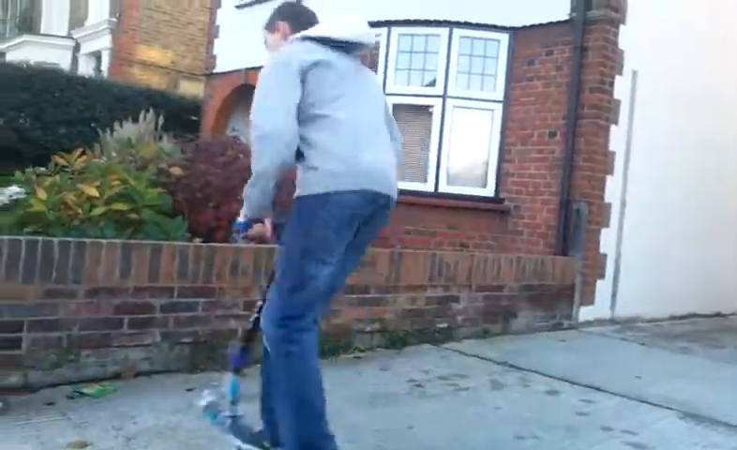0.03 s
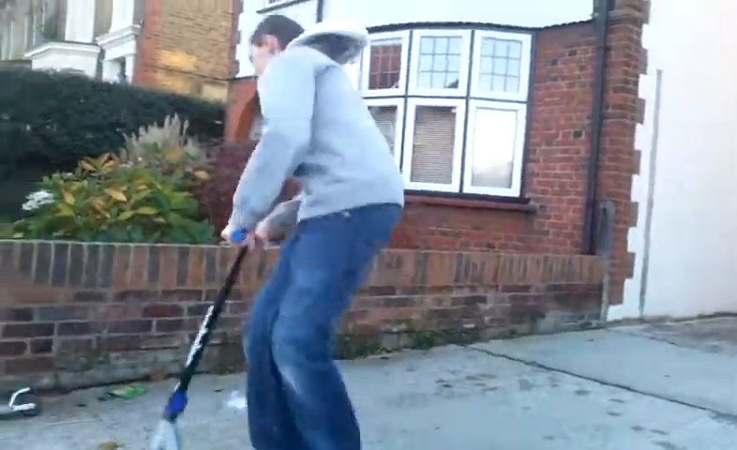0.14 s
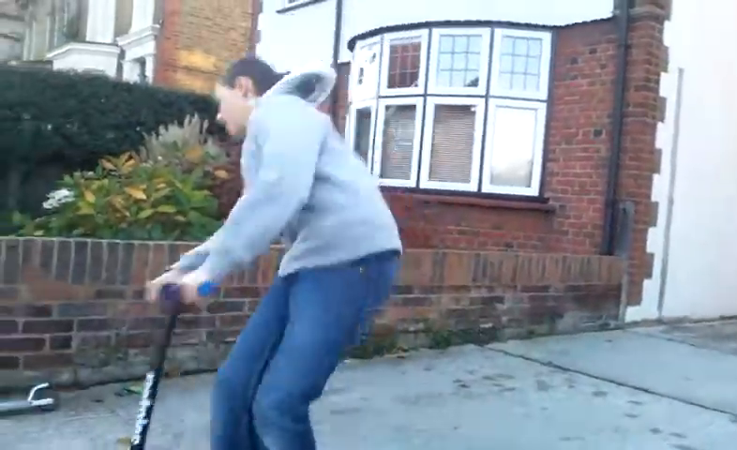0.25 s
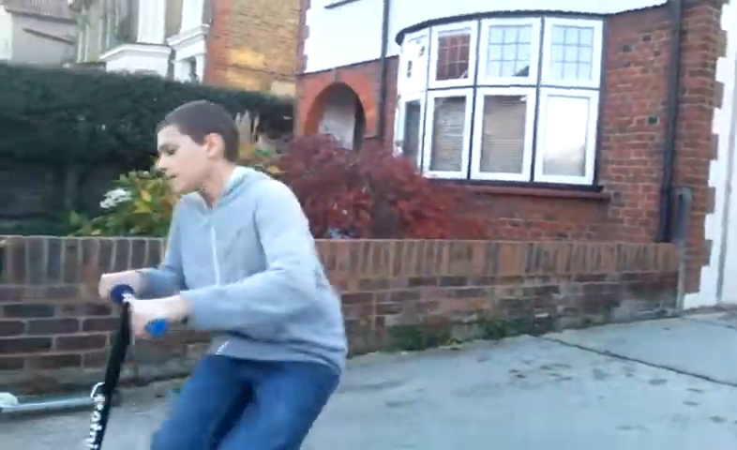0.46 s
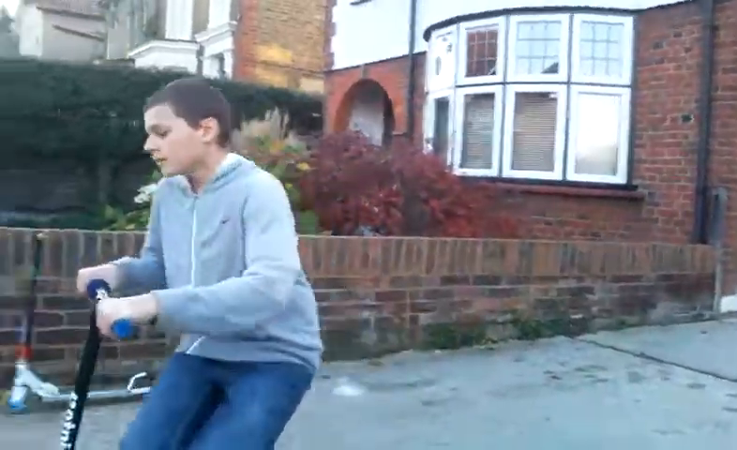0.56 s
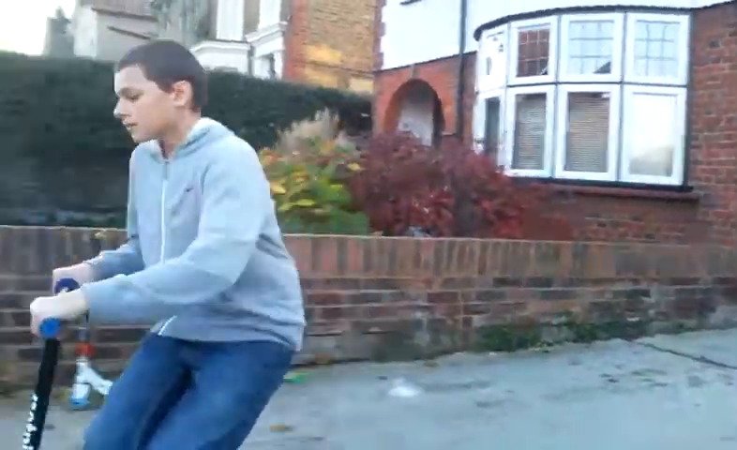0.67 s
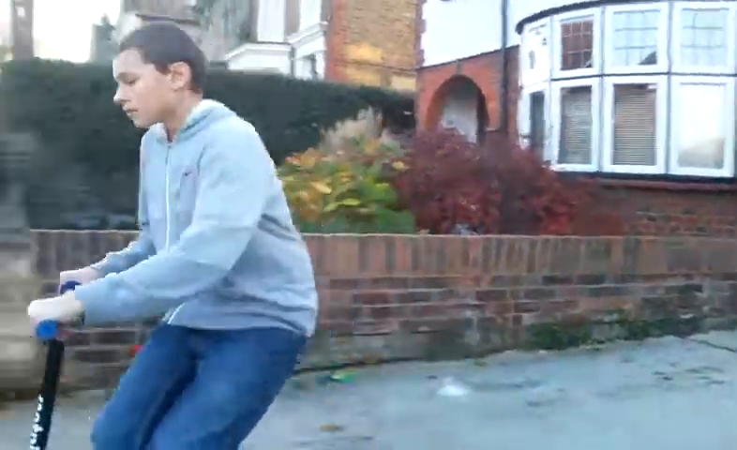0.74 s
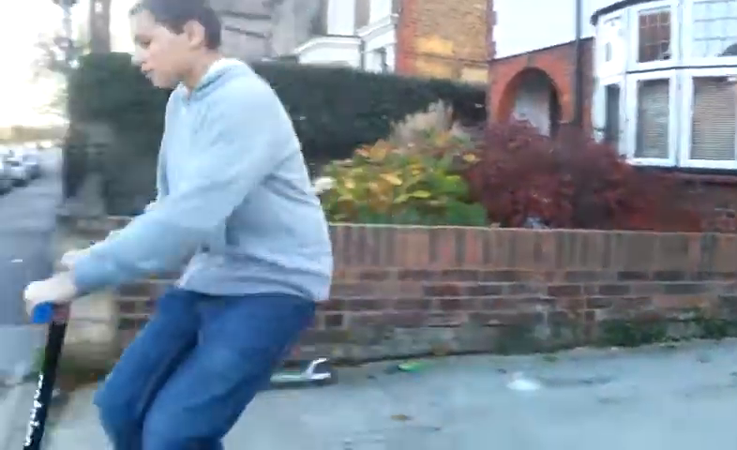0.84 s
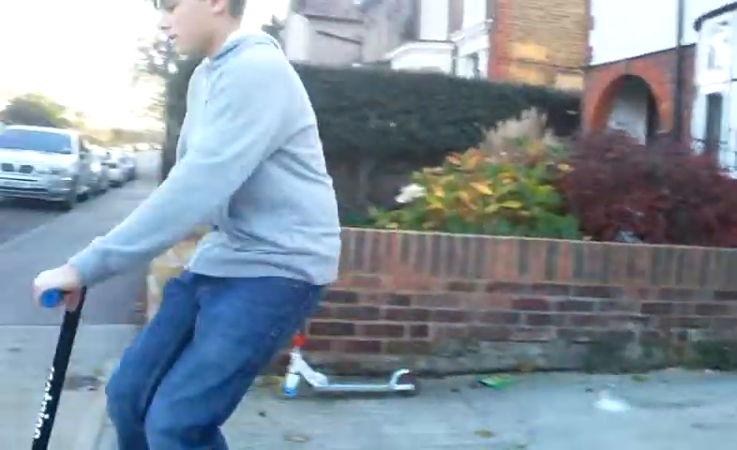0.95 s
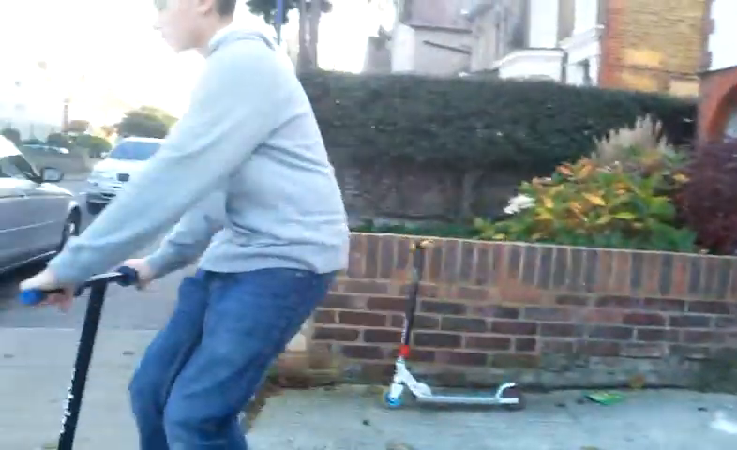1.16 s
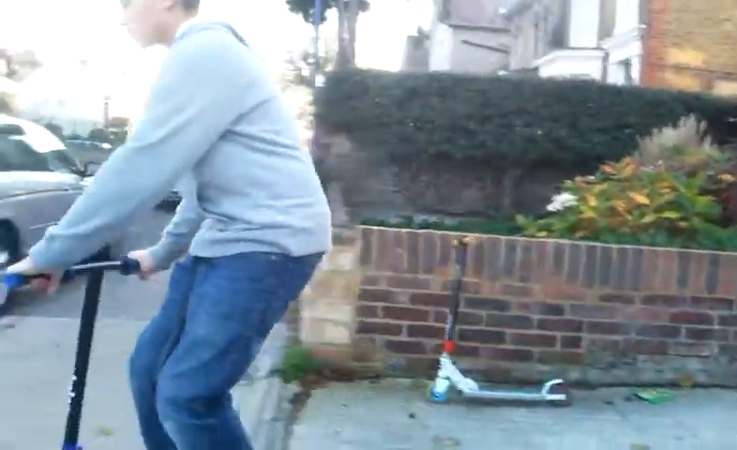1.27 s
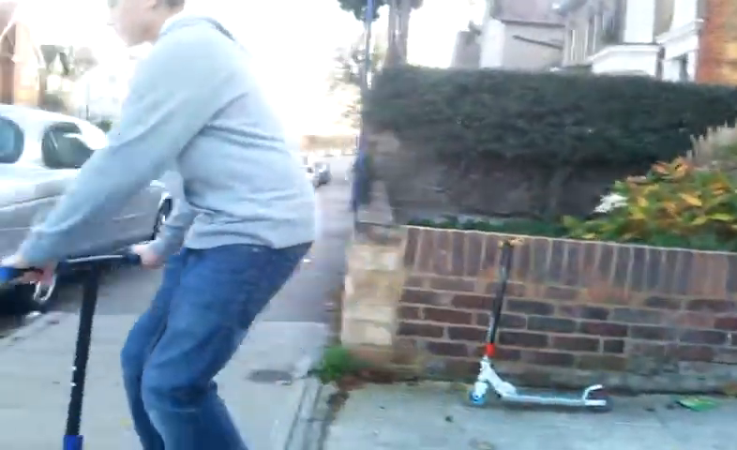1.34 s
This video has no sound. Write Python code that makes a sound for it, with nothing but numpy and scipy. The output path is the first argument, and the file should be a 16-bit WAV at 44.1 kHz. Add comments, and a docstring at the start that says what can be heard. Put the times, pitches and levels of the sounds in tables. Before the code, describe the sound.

Loud knock of a kick scooter landing, followed by light rattles and a smaller knock.

```python
"""Kick scooter landing on pavement

Close by, the front end clacks down, then the deck slams under the rider and overloads the microphone.
The scooter rolls on with small rattles, knocks again over a joint in the paving and grates over grit.
Each knock layers ringing modes with a noise burst. House fronts and a garden wall throw back a short
tail; the street hums quietly underneath, all heard through a narrow-band microphone."""
import sys
import numpy as np
from scipy import signal
from scipy.fft import rfft, irfft
from scipy.io import wavfile

SR = 44100
rng = np.random.default_rng(int(sys.argv[2]) if len(sys.argv) > 2 else 0)


def bounce(signal):
    """Save signal as a 16-bit WAV file at the path given by the first command-line argument."""
    frames = np.transpose(np.atleast_2d(signal))
    limited = np.clip(frames, -1, 1)
    pcm = np.round(limited * 32767).astype(np.int16)
    wavfile.write(sys.argv[1], SR, pcm)


N = 61739
TIME = np.arange(N) / SR


def from_db(db):
    """Decibels to gain."""
    return 10 ** (np.asarray(db) / 20)


def noise(spectrum):
    """Noise of the given colour, rolled off beyond both ends and scaled to rms 1."""
    hz, db = np.transpose(spectrum)
    freq = np.maximum(np.arange(N // 2 + 1) * SR / N, 1)
    colour = from_db(np.interp(np.log(freq), np.log(hz), db))
    roll_off = np.minimum(freq / hz[0], 1) * np.minimum(hz[-1] / freq, 1) ** 4
    x = irfft(rfft(rng.standard_normal(N)) * colour * roll_off, N)
    return x / x.std()


def bursts(times, levels_db, spectrum, t60_s, attack_s=0.00026):
    """Each contact lets loose a burst of noise with a fast attack and an exponential decay."""
    age = np.maximum(TIME - times[:, None], 0)
    shape = (1 - np.exp(-age / attack_s)) * np.exp(-np.log(1000) * age / t60_s)
    envelopes = from_db(levels_db)[:, None] * shape
    return noise(spectrum) * np.sqrt((envelopes ** 2).sum(axis=0))  # overlaps add in power


def ring(times, levels_db, modes, spread_db=2.0):
    """Each contact strikes every mode with a slightly different strength."""
    strength = from_db(levels_db[:, None] + spread_db * rng.standard_normal((len(times), len(modes))))
    out = np.zeros(N)
    for k, (hz, db, t60) in enumerate(modes):
        clicks = np.zeros(N)
        np.add.at(clicks, (times * SR).astype(int), strength[:, k])
        radius = np.exp(-np.log(1000) / (t60 * SR))
        angle = 2 * np.pi * hz / SR
        feedback = [1, -2 * radius * np.cos(angle), radius * radius]
        tone = signal.lfilter([0, np.sin(angle)], feedback, clicks + 1e-18)
        out += (-1) ** k * from_db(db) * tone  # modes alternate in polarity
    return out


def drift(rate_hz):
    """A random modulator gliding between values of spread 1."""
    return np.interp(TIME * rate_hz, np.arange(200), rng.standard_normal(200))


# Low hum of the street: (frequency [Hz], relative level [dB])
STREET_COLOUR = [(25, -28), (40, -9), (58, -2), (110, 1.5), (200, -2), (300, -1.5), (500, -9.5), (750, -11),
                 (1100, -11.5), (2000, -17), (2800, -16.5), (3500, -12.5), (4000, -19.5)]
def street(level_db=-39.5, waver_db=1):
    """The street lays down a quiet, gently wavering bed."""
    return noise(STREET_COLOUR) * from_db(level_db + waver_db * drift(rate_hz=16))


# Early reflections off the walls: (delay [s], level [dB])
WALL_ECHOES = [(.0135, -17), (.031, -28.5), (.102, -30.5)]
def walls(x, tail_db=-18.5, t60_s=0.48, build_s=0.015):
    """House fronts and a garden wall return a few echoes and a scattered tail."""
    envelope = (1 - np.exp(-TIME / build_s)) * np.exp(-np.log(1000) * TIME / t60_s)
    response = rng.standard_normal(N) * envelope
    response *= from_db(tail_db) / np.linalg.norm(response)
    for delay, db in WALL_ECHOES:
        response[int(delay * SR)] += from_db(db)
    return signal.fftconvolve(x, response)[:N]


# Rumble of wheels on concrete: (frequency [Hz], relative level [dB])
ROLL_COLOUR = [(50, -8.5), (105, 7), (180, -5.5), (300, -1.5), (600, -8.5), (1100, -13), (2000, -20),
               (3000, -10), (3500, -10), (4000, -16.5)]
def rolling(start_s=0.35, level_db=-42, fade_db_per_s=5, rough_db=2):
    """After the landing the wheels rumble unevenly and slowly fade."""
    age = TIME - start_s
    rumble = noise(ROLL_COLOUR) * (age > 0)
    return rumble * from_db(level_db - fade_db_per_s * age + rough_db * drift(rate_hz=40))


# Rattle cues: (time [s], level [dB])
RATTLE_CUES = [(.017, -30), (.032, -40), (.044, -33.5), (0.063, -37), (.384, -33.5), (.402, -36.5),
               (.446, -34), (.552, -37.5), (0.5617, -36), (0.57, -29), (0.5906, -29.5), (.622, -37.5),
               (0.645, -41.5), (.670, -23.5), (.682, -28.5), (0.69, -26), (.701, -32.5), (0.7215, -26),
               (.738, -36.5), (1.258, -40), (1.268, -36), (1.273, -26.5), (1.279, -33.5)]
# Bright tick of a loose part: (frequency [Hz], relative level [dB])
RATTLE_COLOUR = [(200, -14.5), (700, -5.5), (1400, -7.5), (2200, -13), (3000, -4.5), (3500, 4.5),
                 (4000, -3.5)]
def rattles():
    """Loose parts rattle, in the air and as the scooter rolls."""
    times, levels_db = np.transpose(RATTLE_CUES)
    return bursts(times, levels_db, RATTLE_COLOUR, t60_s=0.048, attack_s=0.001)


# Grit cues: (time [s], level [dB])
GRIT_CUES = [(1.124, -19), (1.147, -23), (1.169, -25), (1.1900, -20.5), (1.194, -21.5)]
# Rasp of grit: (frequency [Hz], relative level [dB])
GRIT_COLOUR = [(500, -18), (1200, -5), (1900, 0), (2600, 1.5), (3100, -2), (3550, 2.5), (4100, -4.5)]
def grit():
    """Grit grates under a wheel in short, soft-edged scrapes."""
    times, levels_db = np.transpose(GRIT_CUES)
    return bursts(times, levels_db, GRIT_COLOUR, t60_s=0.049, attack_s=0.0041)


# Hollow knock of the wheels: (frequency [Hz], level [dB], t60 [s])
WHEEL_RING = [(355, -10.5, 0.038), (431.5, -12, 0.031), (785, -11, .04), (1074, -12.5, 0.036)]
# Low body of each blow: (frequency [Hz], relative level [dB])
THUD_COLOUR = [(30, -31), (55, -18), (90, 2.5), (150, -0.5), (210, -5), (350, -1.5), (520, -7),
               (800, -16.5), (1500, -44)]
def wheels(times, levels_db):
    """A blow through the wheels gives a hollow knock over a dull thud."""
    knock = ring(times, levels_db, WHEEL_RING)
    thud = bursts(times, levels_db - 6.5, THUD_COLOUR, t60_s=0.055)
    return knock + thud


# Resonances of the deck: (frequency [Hz], level [dB], t60 [s])
DECK_RING = [(513.3, -14.5, .04), (777, -16.5, .05), (914, -13, 0.06), (963, -16.5, 0.052),
             (1004.4, -17.5, 0.15), (1063, -15, 0.074), (1137, -9, 0.082), (1213, -19.5, 0.18),
             (1280, -18, 0.067), (1483, -18.5, 0.03), (1814, -22.5, 0.043)]
# Dense crack of the deck: (frequency [Hz], relative level [dB])
DECK_COLOUR = [(300, -23.5), (650, -10), (800, -9), (1080, 0.5), (1400, -6.5), (1900, -14.5), (2600, -9.5),
               (3800, -11.5)]
def deck(times, levels_db):
    """The struck deck cracks and rings in the midrange."""
    clang = ring(times, levels_db - 2.5, DECK_RING)
    crack = bursts(times, levels_db - 7, DECK_COLOUR, t60_s=0.06)
    return clang + crack


# Resonances of the steering column and its clamp: (frequency [Hz], level [dB], t60 [s])
COLUMN_RING = [(2132, -18.5, .03), (2480, -13, .05), (2607, -12.5, 0.063), (2673, -12, 0.017),
               (2816, -7, 0.033), (3033, -13.5, 0.022), (3313, -12.5, 0.08), (3488, -10.5, .06),
               (3665, -19.5, 0.031)]
# Bright crack of the column: (frequency [Hz], relative level [dB])
COLUMN_COLOUR = [(600, -29.5), (1400, -10.5), (1900, -17), (2400, -4.5), (2800, 5), (3100, -3), (3500, 0.5),
                 (4000, -7.5)]
# Hard metal-on-metal snap: (frequency [Hz], level [dB], t60 [s])
METAL_SNAP = [(2962, -6.5, 0.013)]
def steering_column(times, levels_db):
    """The column and its clamp ring brightly, with a snap as metal meets metal."""
    clink = ring(times, levels_db - 4, COLUMN_RING)
    crack = bursts(times, levels_db - 6.5, COLUMN_COLOUR, t60_s=0.036)
    snap = ring(times, levels_db, METAL_SNAP)
    return clink + crack + snap


# The landing, then the paving joint: (time [s], wheel level [dB], deck level [dB], column level [dB])
KNOCK_CUES = [(0.2363, -13.5, -18, -13), (.2400, -9.5, -16, -3.5), (0.2453, -11, -18, 2),
              (0.2494, -9, -23.5, -14), (.2520, -26, -13, 2), (.2630, -10, -7.5, -14),
              (0.266, -6.5, 0.5, -7), (0.2726, -15, -3.5, -10.5), (.2760, -16.5, -4, -1.5),
              (.2828, -17, -7, -11), (0.2938, -18.5, -21, -20), (0.311, -24.5, -24, -27),
              (.8230, -16, -17, -30), (0.827, -20, -17, -9), (0.8319, -20.5, -21.5, -21),
              (0.8511, -22, -37, -15), (.8630, -27.5, -27, -22.5)]
def knocks():
    """Every blow thuds through the wheels and sets the deck and the steering column ringing."""
    times, wheel_db, deck_db, column_db = np.transpose(KNOCK_CUES)
    return wheels(times, wheel_db) + deck(times, deck_db) + steering_column(times, column_db)


def scene():
    """The mono mix: street bed, scooter and its echoes."""
    scooter = knocks() + rolling() + rattles() + grit()
    return (street() + scooter + walls(scooter))[None]


# Upper edge of the microphone's band: (frequency [Hz], gain [dB])
MIC_ROLL_OFF = [(3650, 0), (3950, -9.5), (4350, -14.5), (4700, -43), (5300, -88.5)]
def record(dry, ceiling=0.68, hardness=11, cutoff_hz=16000):
    """The microphone passes a narrow band; the loudest peaks then overload and spill into the treble."""
    mirrored = np.concatenate([dry, dry[:, ::-1]], axis=1)  # keeps the ends free of clicks
    freq = np.arange(N + 1) * SR / (2 * N)
    band = from_db(np.interp(freq, *np.transpose(MIC_ROLL_OFF)))
    narrow = irfft(rfft(mirrored) * band, 2 * N)[:, :N]
    clipped = narrow / (1 + np.abs(narrow / ceiling) ** hardness) ** (1 / hardness)
    high_cut = signal.cheby2(12, 70, cutoff_hz, fs=SR, output="sos")
    return signal.sosfilt(high_cut, clipped)


dry = scene()
out = record(dry)
bounce(out)
```